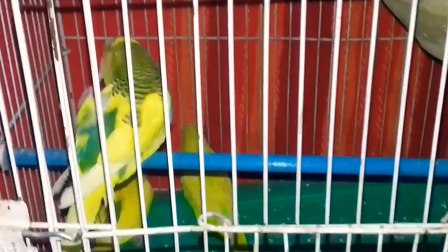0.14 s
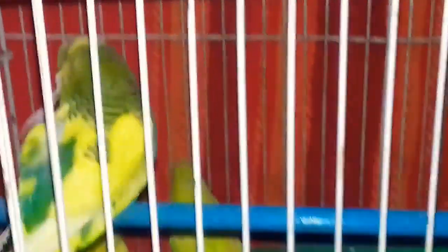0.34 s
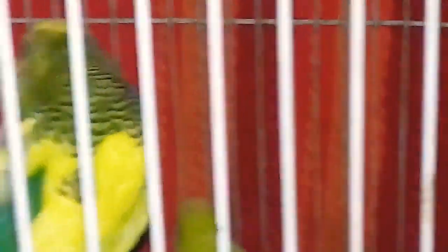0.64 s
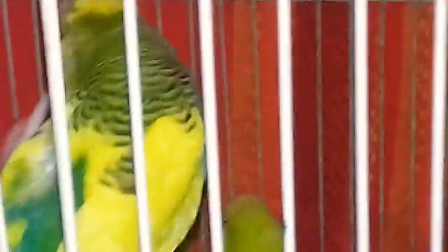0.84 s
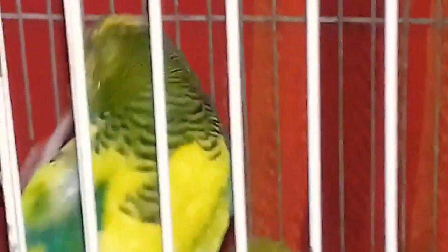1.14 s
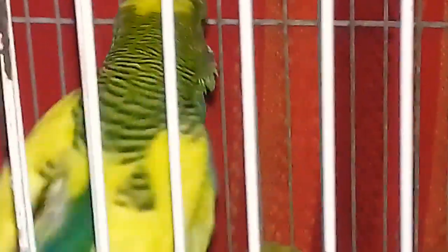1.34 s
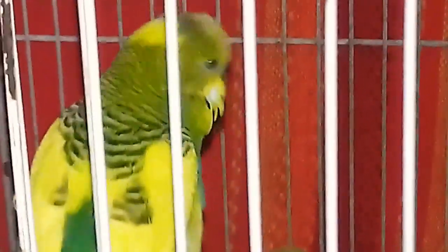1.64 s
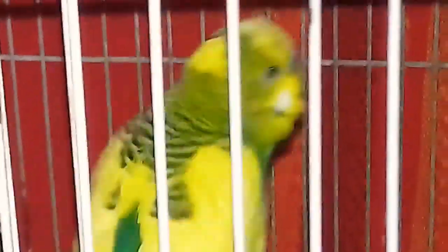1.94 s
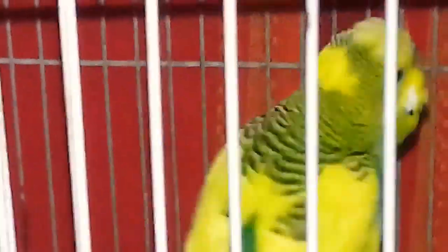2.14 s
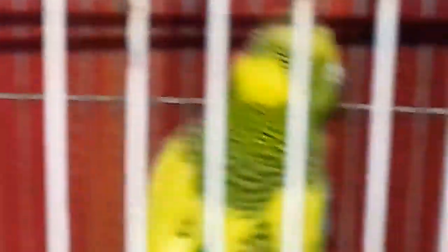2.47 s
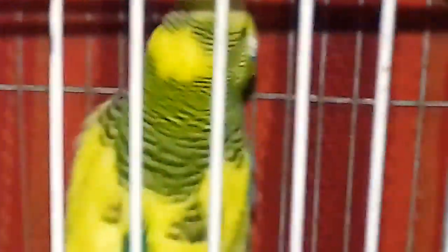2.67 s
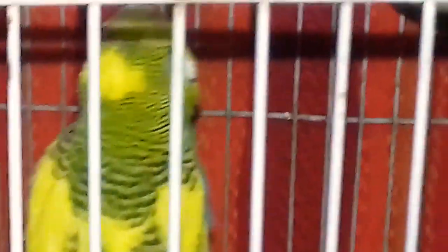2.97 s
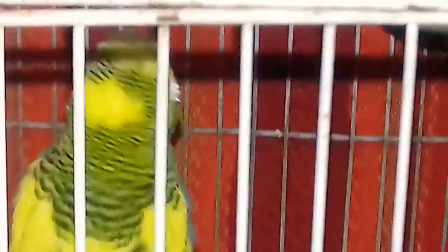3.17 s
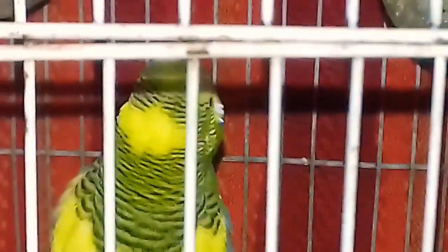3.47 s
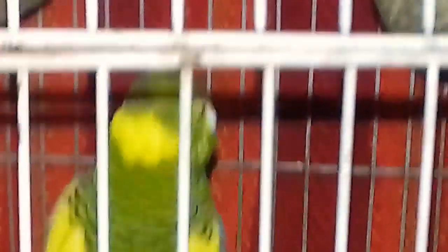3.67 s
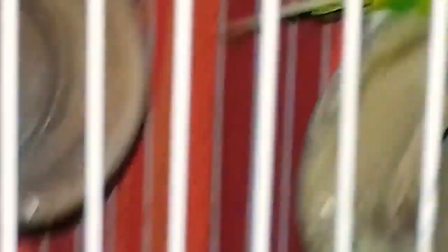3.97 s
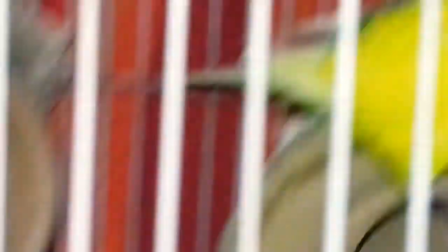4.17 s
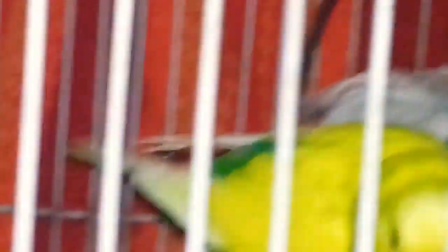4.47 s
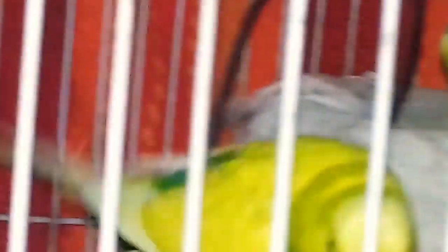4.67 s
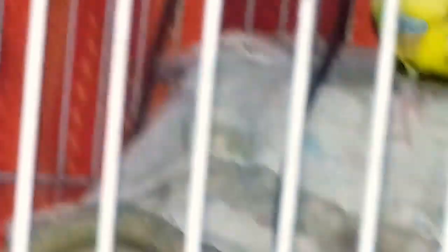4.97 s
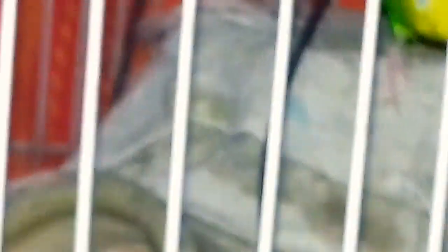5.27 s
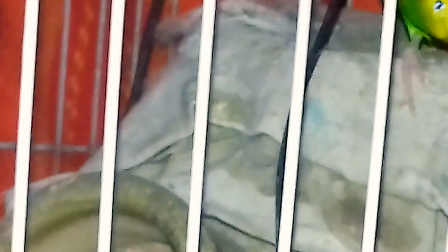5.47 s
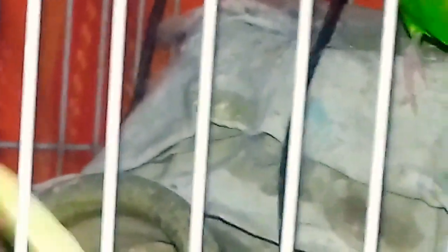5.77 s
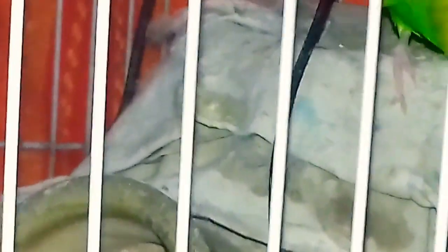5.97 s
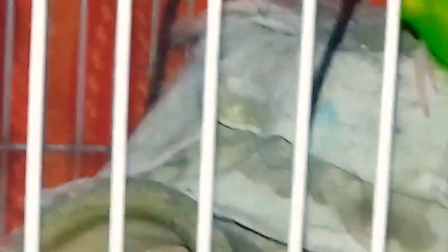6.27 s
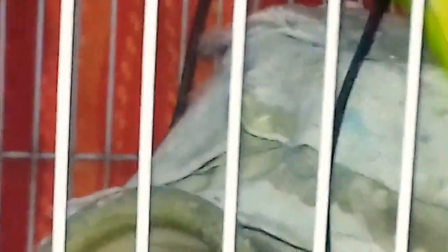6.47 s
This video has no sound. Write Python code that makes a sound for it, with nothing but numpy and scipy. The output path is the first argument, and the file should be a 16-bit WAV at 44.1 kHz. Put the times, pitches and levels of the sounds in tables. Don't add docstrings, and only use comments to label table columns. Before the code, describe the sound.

Caged small parakeets chirp and whistle in a bare echoing room, with soft close warbling, scattered flurries of chatter and a few harsh squawks.

```python
import sys
import numpy as np
from scipy import signal
from scipy.fft import rfft, irfft
from scipy.io import wavfile
from scipy.ndimage import uniform_filter1d

SR = 44100
rng = np.random.default_rng(int(sys.argv[2]) if len(sys.argv) > 2 else 0)


def makeup_ratio(level_db):
    decades = np.asarray(level_db, float) / 20
    return 10 ** decades


def int16_out(signal):
    q = np.round(np.clip(np.atleast_2d(signal).T, -1, 1) * 32767)
    wavfile.write(sys.argv[1], SR, q.astype(np.int16))


N = 291501
TIME = np.arange(N) / SR


def level(x, db):
    return x * makeup_ratio(db) / np.sqrt(np.mean(x ** 2))


def butter(x, order, hz, kind="low"):
    return signal.sosfilt(signal.butter(order, hz, kind, fs=SR, output="sos"), x)


def rings(x, modes):
    out = 0
    for hz, width_hz, db in modes:
        b, a = signal.iirpeak(hz, hz / width_hz, SR)
        once = signal.lfilter(b, a, x)
        out = out + makeup_ratio(db) * signal.lfilter(b, a, once)
    return out


def wobble(count, hz):
    window = int(SR / hz)
    x = uniform_filter1d(rng.standard_normal(count), window)
    return uniform_filter1d(x, window) * np.sqrt(1.5 * SR / hz)


def strokes(*groups):
    notes = []
    for rows, (start_share, end_share) in groups:
        for s, length, hz, db in rows:
            notes.append((s, length, start_share * hz, hz, end_share * hz, db))
    return notes


# pitch in Hz, width in Hz, level in dB.
AIR_COLOUR = [(1400, 440, 2), (2900, 990, 0), (3850, 200, -32), (6860, 890, -45.5)]


def whistles(notes, second_db, third_db, flutter_db, drift, throat_hz, air_db):
    out, effort = np.zeros(N + SR), np.zeros(N + SR)
    size, bend = wobble(N + SR, 500), wobble(N + SR, 373)
    for s, length, start_hz, mid_hz, end_hz, db in notes:
        at = int(max(s, 0) * SR) + np.arange(int(length * SR))
        u = np.linspace(0, 1, len(at))
        hz = start_hz * (1 - u) * (1 - 2 * u) + mid_hz * 4 * u * (1 - u) + end_hz * u * (2 * u - 1)
        phase = 2 * np.pi * np.cumsum(hz * (1 + drift * bend[at])) / SR
        upper = np.sin(3 * phase) + makeup_ratio(-11) * np.sin(4 * phase)
        tone = np.sin(phase) + makeup_ratio(second_db) * np.sin(2 * phase) + makeup_ratio(third_db) * upper
        opening = np.minimum(u * length / .004, (1 - u) * length / .006)
        shape = np.sin(np.pi / 2 * np.minimum(1, opening)) ** 2
        push = makeup_ratio(db + flutter_db * size[at]) * shape
        out[at] += push * tone
        effort[at] += push
    tone = butter(out[:N], 6, throat_hz) + makeup_ratio(-24) * out[:N]
    air = rings(effort[:N] * rng.standard_normal(N), AIR_COLOUR)
    return tone + makeup_ratio(air_db) * air


# start in seconds, length in seconds, middle pitch in Hz, level in dB.
RISING_CHIRPS = [(.045, 0.03, 2940, -39.5), (.258, 0.015, 1950, -52), (.578, 0.056, 1958, -38),
                 (.64, 0.017, 2577, -29.5), (.652, 0.03, 2600, -48), (1.584, 0.032, 2710, -33.5),
                 (1.677, 0.026, 2706, -32), (1.882, 0.0037, 2600, -44), (2.176, 0.024, 2680, -43),
                 (2.628, 0.023, 2930, -25), (2.65, 0.024, 2060, -36), (2.86, 0.0067, 2230, -44),
                 (3.569, 0.099, 3095, -46.5), (3.627, 0.037, 3190, -39), (3.749, 0.01, 2870, -16),
                 (3.824, 0.012, 2755, -15), (4.301, 0.025, 3260, -28), (4.556, 0.025, 2102, -24.5),
                 (4.639, 0.005, 2520, -16.5), (4.774, 0.008, 2230, -26), (5.122, 0.016, 3103, -29),
                 (4.575, 0.028, 2505, -26.5), (4.605, .025, 2297, -26.5), (4.565, 0.019, 4170, -40),
                 (4.774, 0.0094, 4160, -33.5)]
# start in seconds, length in seconds, middle pitch in Hz, level in dB.
FALLING_CHIRPS = [(2.597, 0.017, 2017, -25), (.07, 0.018, 2350, -42), (.276, 0.03, 2320, -36.5),
                  (.304, 0.027, 2004, -38), (.328, 0.048, 2803, -38), (.671, 0.072, 2607, -38.5),
                  (.83, 0.017, 2534, -37), (1.698, 0.02, 2113, -33), (1.727, 0.013, 2760, -28),
                  (1.761, 0.018, 2602, -27), (1.78, 0.016, 2970, -27), (1.965, 0.012, 2870, -33),
                  (2.474, 0.0094, 3090, -41), (2.681, 0.024, 2046, -28.5), (3.15, 0.021, 2094, -39.5),
                  (3.332, 0.042, 1900, -41.5), (3.754, 0.036, 3290, -21.5), (3.835, 0.028, 2076, -18.5),
                  (3.849, 0.018, 3516, -14.5), (4.154, 0.031, 1966, -30), (4.79, 0.019, 3330, -33.5),
                  (4.804, .013, 2036, -27.5), (.573, 0.025, 1896, -38), (2.503, 0.019, 3490, -45.5),
                  (5.262, 0.0044, 2300, -26.5), (6.133, 0.021, 1948, -23), (4.326, 0.0065, 2720, -25.5),
                  (4.333, 0.0087, 2320, -19.5), (.312, 0.045, 1760, -39), (2.478, 0.042, 2030, -34.5),
                  (2.494, 0.019, 1793, -32), (1.788, 0.014, 2778, -25.5)]
# start in seconds, length in seconds, middle pitch in Hz, level in dB.
HELD_CHIRPS = [(.33, 0.021, 2160, -38), (.715, 0.051, 2060, -37), (.779, 0.0067, 2800, -19.5),
               (1.415, 0.058, 2483, -42.5), (2.518, 0.048, 2100, -52), (2.562, 0.046, 3050, -31.5),
               (2.59, 0.045, 3390, -29.5), (2.606, 0.031, 2750, -32), (2.765, 0.0067, 2300, -22),
               (2.982, .014, 1620, -34.5), (.011, .014, 2720, -29), (.011, 0.014, 3240, -37),
               (4.965, 0.019, 2520, -18.5), (4.966, 0.015, 3280, -15), (4.958, 0.015, 4200, -31.5),
               (.018, 0.014, 1700, -35.5), (.014, 0.0094, 4200, -50), (.222, .014, 4900, -54),
               (.24, 0.02, 3560, -37.5), (6.23, 0.022, 3070, -18), (2.512, 0.059, 1720, -40.5),
               (6.258, .009, 3200, -16), (6.271, .009, 3000, -17), (6.211, .007, 3100, -17),
               (3.651, 0.014, 2850, -36.5), (3.737, 0.017, 2770, -28), (3.768, 0.0088, 2650, -10),
               (3.775, 0.006, 2200, -17.5), (3.785, 0.01, 3300, -17), (0.046, 0.0084, 3000, -41),
               (.108, 0.013, 2986, -42), (3.791, 0.014, 2895, -13), (3.802, 0.016, 3250, -11),
               (3.81, 0.005, 3590, -12), (3.816, 0.027, 3200, -14), (3.858, 0.034, 2567, -18.5),
               (3.3, 0.0072, 1900, -30), (4.275, 0.012, 2840, -19.5), (4.699, 0.008, 2390, -19),
               (4.842, 0.0035, 2160, -13), (5.088, 0.024, 2500, -23), (5.172, 0.017, 2480, -19.5),
               (4.995, .014, 3380, -18.5), (5.308, 0.018, 3100, -30), (5.562, 0.0031, 2240, -33.5),
               (5.48, 0.055, 1300, -48.5), (5.54, 0.069, 1160, -58.5), (6.9, 0.045, 1176, -59.5),
               (4.8, 0.074, 1200, -63.5), (5.61, 0.049, 1500, -48.5), (5.7, 0.02, 1400, -59.5)]


def chirps():
    notes = strokes((RISING_CHIRPS, (.93, 1.07)), (FALLING_CHIRPS, (1.05, .93)), (HELD_CHIRPS, (1.0, .98)))
    return whistles(notes, second_db=-37, third_db=-46, flutter_db=4, drift=.045, throat_hz=3900, air_db=-18.5)


# start in seconds, length in seconds, middle pitch in Hz, level in dB.
SWOOPING_CHIRPS = [
    (3.555, 0.014, 1500, -36),
    (2.556, 0.013, 3250, -35),
    (3.696, .051, 1942, -27),
]


def swooping_chirps():
    notes = strokes((SWOOPING_CHIRPS, (1.19, .8)))
    return whistles(notes, second_db=-9.5, third_db=-19, flutter_db=3, drift=.035, throat_hz=3450, air_db=-15.5)


# start in seconds, length in seconds, throat pitch in Hz, level in dB, brightness in dB.
SQUAWK_CALLS = [(0.215, 0.018, 2623, -44.5, -22), (0.575, .026, 2600, -36, -44.5),
                (1.4, 0.024, 1550, -41, -25), (1.403, .03, 3300, -46.5, -24),
                (1.541, 0.034, 2960, -35, -30), (2.603, 0.043, 2286, -33, -65),
                (2.641, 0.029, 2500, -37, -61), (4.545, 0.013, 2620, -38.5, -42),
                (4.907, .028, 3180, -25.5, -39.5), (4.911, .045, 2477, -24, -45.5),
                (4.965, 0.03, 2551, -21, -31), (4.974, .044, 2480, -20.5, -16),
                (4.982, .04, 3170, -19, -28.5), (5.013, 0.03, 3040, -24, -22.5),
                (5.082, .028, 2633, -19, -28), (5.172, 0.018, 2526, -29.5, -39),
                (6.009, 0.024, 3120, -27.5, -21), (6.021, 0.026, 2799, -23, -20.5),
                (6.034, .028, 2606, -20, -25.5), (6.135, .014, 3115, -21.5, -22),
                (6.138, 0.0338, 3096, -18, -16.5), (6.181, 0.0372, 2900, -23, -25.5),
                (6.23, 0.0458, 2624, -20.5, -31)]
# pitch in Hz, width in Hz, level in dB.
BEAK_RINGS = [(1900, 830, -3.5), (1370, 290, -19.5), (3370, 630, 2.5), (4070, 680, -25.5)]
# pitch in Hz, width in Hz, level in dB.
RASP_RINGS = [(5330, 2050, 16.5), (6400, 880, -8), (8400, 840, -7)]
# pitch in Hz, width in Hz, level in dB.
SHEEN_RINGS = [(14700, 1900, -0.5), (11800, 1500, -7)]


def squawks():
    out, air = np.zeros(N + SR), rng.standard_normal(N)
    pace, bend, force = wobble(N, 300), wobble(N, 700), wobble(N, 300)
    for s, length, throat_hz, db, bright_db in SQUAWK_CALLS:
        slap_hz = 281 * np.sqrt(0.03046 / length)
        at = int(s * SR) + np.arange(int(length * SR))
        shape = np.sin(np.pi * np.linspace(0, 1, len(at)) ** .8) ** .8
        cycle = np.cumsum(slap_hz * (1 + 0.3 * pace[at])) / SR
        gate = shape * np.abs(np.sin(np.pi * cycle)) ** 1.4 * makeup_ratio(2.2 * force[at])
        phase = 2 * np.pi * np.cumsum(throat_hz * (1 + .085 * bend[at])) / SR
        puffs = gate * air[at]
        hiss = np.sqrt(shape * gate) * air[at]

        overtones = gate * (np.sin(2 * phase) + makeup_ratio(-25.5) * np.sin(3 * phase))
        rasp = level(overtones, -7) + level(rings(hiss, RASP_RINGS), -1.1)
        bright = butter(rasp, 4, 9150) + level(rings(hiss, SHEEN_RINGS), -34)

        body = level(gate * np.sin(phase), db) + level(rings(puffs, BEAK_RINGS), db - 10.5)
        body = butter(body, 4, 5470 + 27 * bright_db)
        out[at] += body * np.minimum(1, 4 * shape) + level(bright * shape, db + bright_db)
    return out[:N]


# start in seconds, length in seconds, middle pitch in Hz, level in dB.
RISING_NOTES = [(.07, 0.021, 1177, -38.5), (.22, 0.013, 1275, -46), (.237, 0.032, 1737, -33.5),
                (.768, 0.011, 914, -37), (1.284, 0.029, 755, -54), (1.715, 0.027, 1294, -43),
                (2.321, 0.015, 1330, -39.5), (2.786, 0.0098, 1340, -34), (2.857, 0.0089, 980, -37),
                (2.888, 0.0063, 1130, -32), (2.93, 0.037, 1084, -40), (3.012, 0.013, 1300, -38),
                (3.108, 0.012, 970, -35), (3.15, 0.0083, 1470, -33), (3.224, 0.037, 1188, -39),
                (3.278, 0.028, 1353, -40), (3.487, 0.02, 1028, -40), (4.058, 0.026, 1112, -39),
                (4.506, .009, 1150, -37), (4.517, 0.01, 1187, -27), (4.839, 0.01, 1070, -33.5),
                (4.892, 0.0063, 1310, -33.5), (4.928, 0.016, 1025, -41), (5.418, 0.0051, 1260, -40.5),
                (5.425, 0.0074, 1642, -27), (6.511, 0.01, 940, -40)]
# start in seconds, length in seconds, middle pitch in Hz, level in dB.
FALLING_NOTES = [(.012, 0.028, 860, -54), (.703, 0.027, 1034, -33), (.842, 0.013, 830, -65),
                 (.895, 0.01, 940, -50), (.94, 0.031, 853, -50), (.808, 0.023, 935, -38.5),
                 (1.928, 0.021, 920, -43), (2.2, .03, 726, -61), (1.42, 0.036, 805, -52.5),
                 (3.866, .012, 880, -38.5), (1.958, 0.016, 1356, -38.5), (4.538, 0.015, 1693, -32.5),
                 (2.005, 0.024, 1076, -41.5), (2.176, 0.022, 1300, -43), (2.506, 0.0042, 1150, -28),
                 (2.536, 0.052, 751, -52.5), (2.665, 0.041, 763, -50), (2.912, 0.04, 996, -45),
                 (3.203, 0.028, 1041, -39.5), (3.256, 0.026, 1013, -40), (3.198, 0.0093, 1430, -38.5),
                 (3.337, 0.01, 1096, -34), (3.775, 0.0037, 1250, -25), (4.09, 0.0066, 1179, -21.5),
                 (4.116, 0.015, 1103, -36.5), (4.155, 0.055, 1012, -47.5), (4.227, 0.019, 1118, -38),
                 (5.125, 0.0078, 905, -35.5), (5.467, 0.022, 1623, -34.5), (5.529, 0.024, 1400, -39),
                 (6.52, 0.038, 1132, -41), (5.778, 0.019, 1420, -50.5)]
# start in seconds, length in seconds, middle pitch in Hz, level in dB.
SWOOPING_NOTES = [
    (1.676, 0.041, 1217, -39),
    (1.803, 0.008, 1120, -41),
    (2.4, 0.055, 870, -49.5),
    (2.958, 0.04, 961, -42.5),
    (3.856, 0.021, 1113, -35.5),
]
# start in seconds, length in seconds, middle pitch in Hz, level in dB.
ARCHING_NOTES = [
    (.095, 0.02, 1680, -38.5),
    (.728, 0.04, 1179, -34.5),
    (.783, 0.031, 1195, -34),
    (1.026, 0.03, 1198, -46),
    (1.737, 0.02, 1320, -40),
    (1.815, 0.05, 782, -51),
    (1.893, 0.04, 1051, -38),
    (2.639, 0.0075, 1094, -27.5),
    (3.401, 0.022, 1286, -39.5),
    (6.59, 0.0085, 1117, -41.5),
]
# start in seconds, length in seconds, middle pitch in Hz, level in dB.
DIVING_NOTES = [
    (1.404, .014, 1700, -43),
    (1.553, .016, 1800, -42),
    (1.794, .02, 1900, -38),
]
# start in seconds, length in seconds, middle pitch in Hz, level in dB.
HUMPED_NOTES = [
    (1.822, 0.057, 1166, -39),
]


def warble():
    notes = strokes((RISING_NOTES, (.89, 1.1)), (FALLING_NOTES, (1.1, .92)), (SWOOPING_NOTES, (1.22, .76)),
                    (ARCHING_NOTES, (.89, .89)), (DIVING_NOTES, (1.55, .4)), (HUMPED_NOTES, (.7, .74)))
    return whistles(notes, second_db=-12, third_db=-22, flutter_db=2.5, drift=.032, throat_hz=3600, air_db=-17)


# start in seconds, length in seconds, middle pitch in Hz, level in dB.
PRESSED_NOTES = [
    (.01, 0.0079, 910, -36.5),
    (.221, 0.02, 1283, -36),
    (.258, 0.01, 2020, -41),
    (1.415, 0.016, 2530, -38.5),
]


def pressed_notes():
    notes = strokes((PRESSED_NOTES, (1.0, .98)))
    return whistles(notes, second_db=-1.5, third_db=-14, flutter_db=1.9, drift=.045, throat_hz=4340, air_db=-24)


# start in seconds, length in seconds, middle pitch in Hz, level in dB.
STRAINED_NOTES = [
    (2.575, 0.026, 3490, -32),
    (3.806, 0.046, 3620, -32.5),
    (3.845, 0.066, 3577, -24.5),
    (3.826, .03, 3810, -27.5),
    (3.885, .025, 3750, -29),
    (4.325, 0.015, 3300, -29),
]


def strained_notes():
    notes = strokes((STRAINED_NOTES, (1.0, .98)))
    return whistles(notes, second_db=-19.5, third_db=-34, flutter_db=1, drift=.033, throat_hz=4500, air_db=-17)


def flurries(peaks, rest_db):
    power = makeup_ratio(rest_db) ** 2
    for s, db in peaks:
        late = TIME - s
        slope_db = np.where(late < 0, 139.5 * late, -77.5 * late)
        power = power + makeup_ratio(db + slope_db) ** 2
    return np.sqrt(power)


def crowd(size_now, low_hz, span_hz, count=900, throat_hz=3580, drift=.046):
    s, length, pitch, spread, glide, size = rng.random((count, 6)).T
    hz = low_hz + span_hz * (pitch + spread) / 2
    mid_hz = hz * (.85 + 0.2928 * glide)
    end_hz = hz * (0.794 + 0.25 * glide)
    notes = np.transpose([s * N / SR, 0.0118 + 0.0196 * length, hz, mid_hz, end_hz, 5 * size])
    return whistles(notes, -22.5, -32.5, 4.11, drift, throat_hz, air_db=-15.5) * size_now


# time in seconds, peak level in dB.
FLOCK_FLURRIES = [(0, -50.5), (.3, -50.5), (.8, -43.5), (1.0, -49), (1.45, -45.5), (1.8, -43), (2.55, -38),
                  (2.7, -43), (3.5, -50.5), (3.86, -32.5), (4.2, -35), (4.35, -49.5), (4.6, -39.5),
                  (5.0, -38), (5.15, -44.5), (5.4, -46), (6.05, -49), (6.25, -65), (5.85, -69.5)]
# time in seconds, peak level in dB.
MUTTER_FLURRIES = [
    (0, -53.5),
    (.85, -48.5),
    (1.0, -56),
    (1.42, -53.5),
    (1.97, -50),
    (2.05, -50),
    (2.25, -53),
    (3.3, -56.5),
    (4.2, -54),
]


def flock():
    chatter = crowd(flurries(FLOCK_FLURRIES, -58.5), 1420.6, 1952.4)
    mutter = crowd(flurries(MUTTER_FLURRIES, -92), 657.7, 900, count=400)
    return chatter + mutter


# time in seconds, peak level in dB.
TWITTER_FLURRIES = [(0, -62.5), (.1, -80), (.27, -56.5), (4.57, -59), (4.79, -60), (.62, -54), (.8, -71),
                    (1.42, -58.5), (1.56, -56), (3.84, -45), (3.95, -51), (5.02, -36.5), (5.2, -58),
                    (6.2, -43.5)]
# time in seconds, peak level in dB.
MURMUR_FLURRIES = [
    (5.5, -46),
    (5.6, -58.5),
    (5.7, -62.5),
    (5.78, -69),
]


def twitter():
    high = crowd(flurries(TWITTER_FLURRIES, -88), 3200, 1802, count=800, throat_hz=4140, drift=.11)
    murmur = crowd(flurries(MURMUR_FLURRIES, -99), 1120, 480, count=300)
    return high + murmur


# pitch in Hz, time in seconds for the echo to drop by 60 dB.
ROOM_RINGING = [(500, 0.82), (900, 1.05), (1400, 1.21), (2200, 1.31), (3400, 1.26), (5300, 0.9),
                (6400, 1.03), (7600, 0.62), (10000, 0.4), (14000, 0.15)]


def room():
    t = np.arange(3 * SR // 2) / SR
    lumps_db = (2 + 4 * wobble(len(t), 500)) * np.exp(-t / 0.018)
    noise = rng.standard_normal(len(t)) * makeup_ratio(lumps_db)
    hz, t60 = np.transpose(ROOM_RINGING)
    out = 0
    for low in 350 * 2 ** np.arange(0, 5.6, .25):
        band_filter = signal.butter(1, [low, low * 2 ** .25], "band", fs=SR, output="sos")
        band = signal.sosfiltfilt(band_filter, noise)
        ring_s = np.interp(np.log(low * 2 ** .125), np.log(hz), t60)
        out = out + band * makeup_ratio(-60 * t / ring_s)
    out *= 1 - np.exp(-(t / .014) ** 2)
    return out / np.sqrt(np.sum(out ** 2))


# time in seconds, level in dB.
HUM_SWELL = [
    (0.0, -58),
    (0.02, -62.5),
    (1.32, -62.5),
    (1.8, -74),
    (2.7, -65),
    (3.18, -69),
    (4.82, -60),
    (5.34, -67.5),
    (6.61, -77),
]


def mains_hum():
    hum_db = np.interp(TIME, *np.transpose(HUM_SWELL)) + 0.77 * wobble(N, 5.1)
    return 2 ** .5 * makeup_ratio(hum_db) * np.sin(2 * np.pi * 100.0 * TIME)


# pitch in Hz, level in dB per Hz.
HISS_COLOUR = [(25, -5.5), (52, -3), (72, 10.5), (150, 12), (400, 8), (1000, 8), (1500, 17.5), (4000, -10),
               (8000, -14), (16000, -15.5)]


def hiss():
    hz, db = np.transpose(HISS_COLOUR)
    shape = makeup_ratio(np.interp(np.log(np.fft.rfftfreq(N, 1 / SR) + 1), np.log(hz), db))
    return level(irfft(rfft(rng.standard_normal(N)) * shape, N), -56)


# time in seconds, level in dB.
FINGER_SHIFTS = [
    (2.0, -95),
    (2.07, -76),
    (2.4, -79),
    (2.6, -93),
    (6.0, -88),
    (6.25, -76),
    (6.5, -86),
]


def handling():
    thud = butter(rng.standard_normal(N), 2, [35, 60], "band")
    return level(thud, 0) * makeup_ratio(np.interp(TIME, *np.transpose(FINGER_SHIFTS)))


# time in seconds, level in dB.
FEATHER_BRUSH = [
    (.03, -96),
    (.09, -72),
    (.22, -90.5),
]


def feathers():
    brush = rings(rng.standard_normal(N), [(12500, 4000, 0)])
    return level(brush, 0) * makeup_ratio(np.interp(TIME, *np.transpose(FEATHER_BRUSH)))


def scene():
    far = chirps() + swooping_chirps()
    rasp = squawks()
    near = warble() + pressed_notes() + strained_notes()
    chatter, high = flock(), twitter()
    far, rasp, high = butter([far, rasp, high], 8, 1060, "high")

    echo = room()
    to_walls = makeup_ratio(-10.5) * near + makeup_ratio(-5) * (far + rasp) + chatter + high
    wash = signal.fftconvolve(to_walls, echo)[:N]
    lead = SR // 10
    earlier = signal.fftconvolve((chatter + high)[:lead], echo)
    wash[:len(echo)] += makeup_ratio(6) * earlier[lead - 1:]

    direct = near + far + makeup_ratio(-1.5) * rasp
    background = mains_hum() + hiss() + handling() + feathers()
    return (direct + wash + background)[None]


def low_pass(x):
    return signal.sosfilt(signal.butter(12, 15800, fs=SR, output="sos"), x)


def record(dry):
    fade = np.minimum(1, (N - np.arange(N)) / 64)
    return low_pass(dry * fade)


dry = scene()
out = record(dry)
int16_out(out)
```